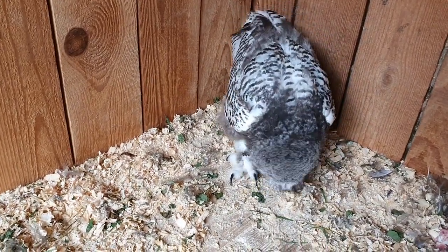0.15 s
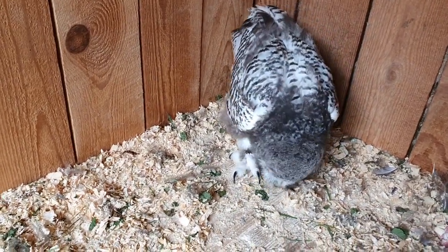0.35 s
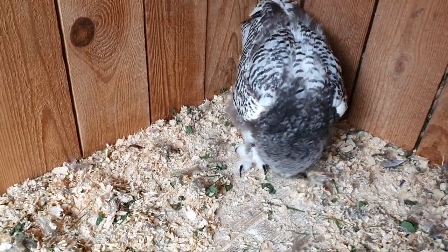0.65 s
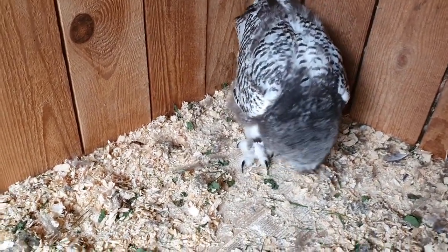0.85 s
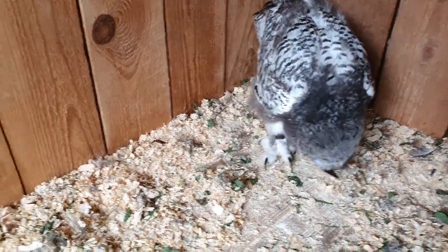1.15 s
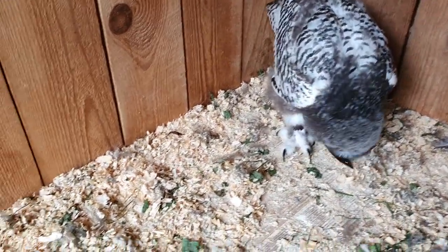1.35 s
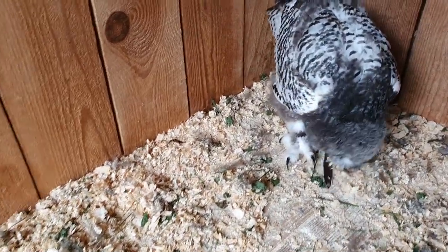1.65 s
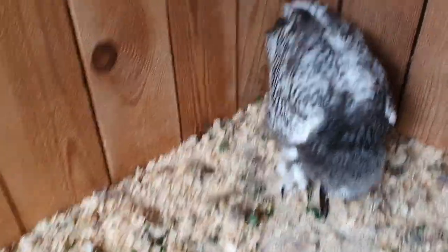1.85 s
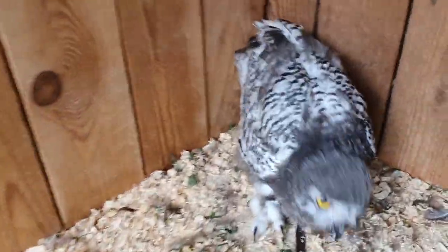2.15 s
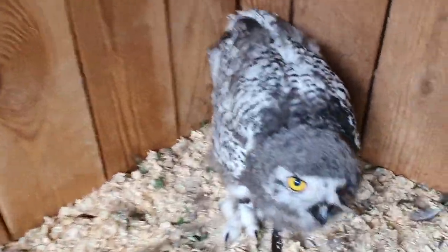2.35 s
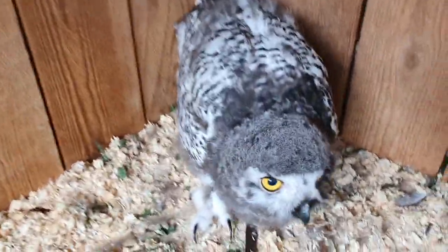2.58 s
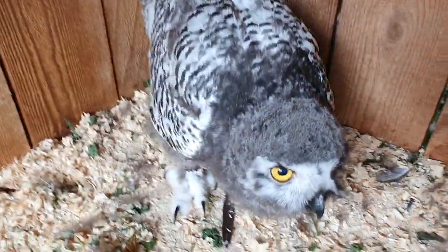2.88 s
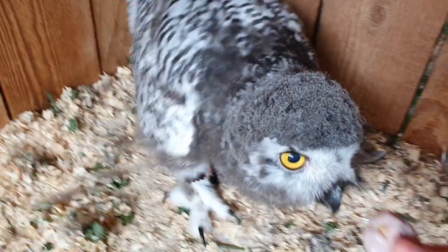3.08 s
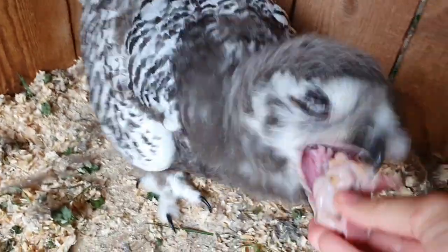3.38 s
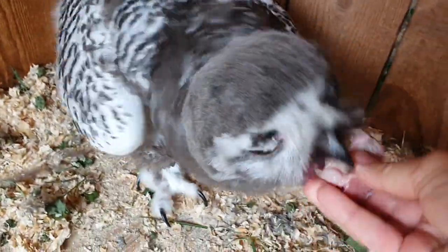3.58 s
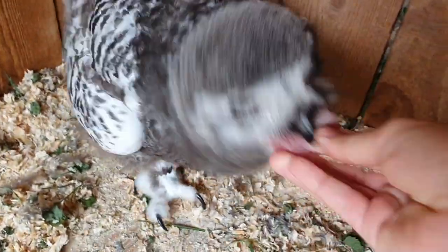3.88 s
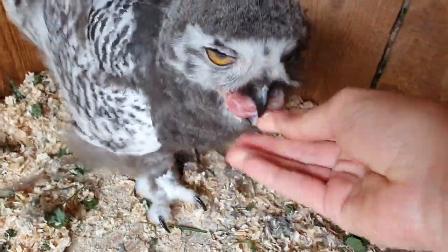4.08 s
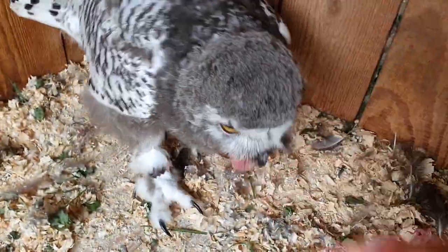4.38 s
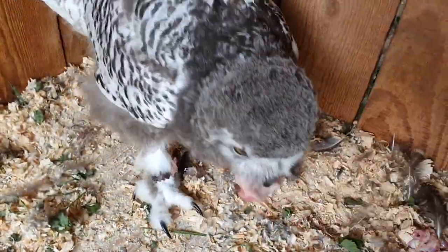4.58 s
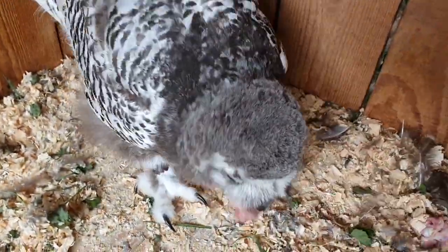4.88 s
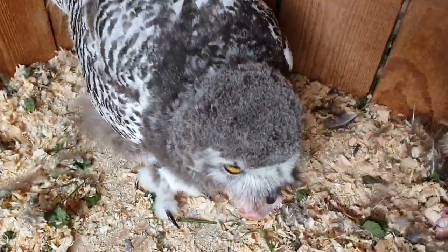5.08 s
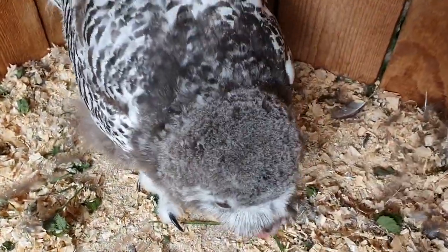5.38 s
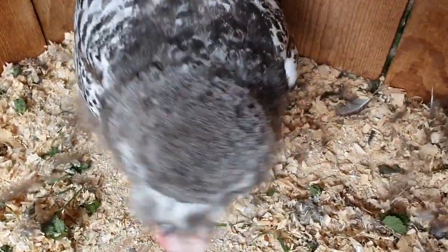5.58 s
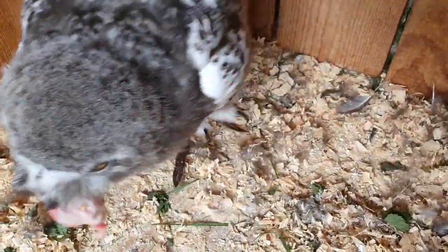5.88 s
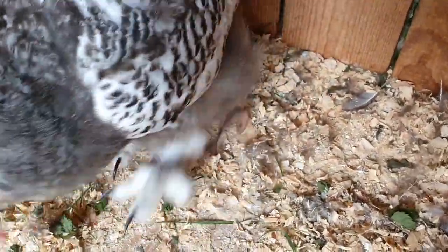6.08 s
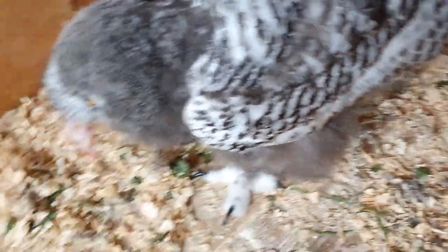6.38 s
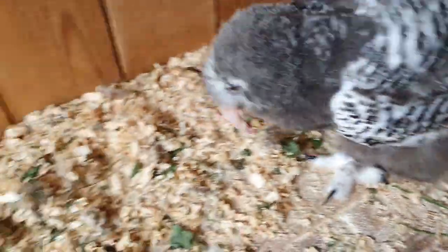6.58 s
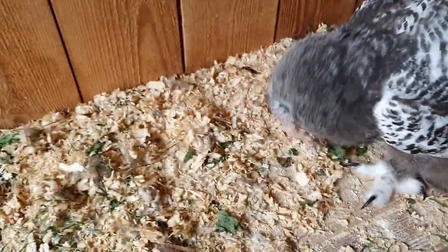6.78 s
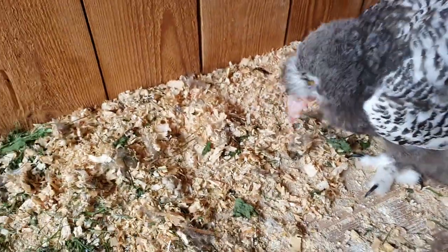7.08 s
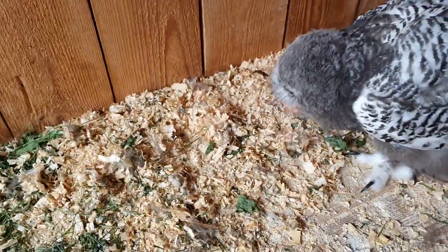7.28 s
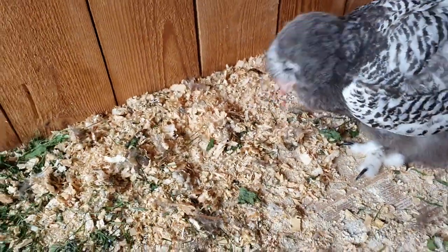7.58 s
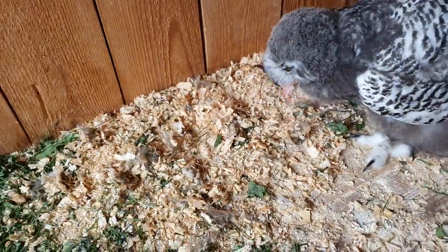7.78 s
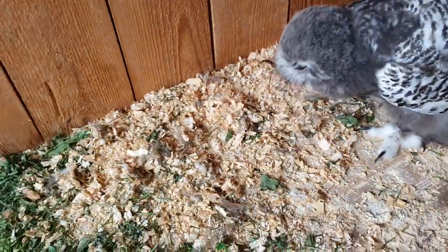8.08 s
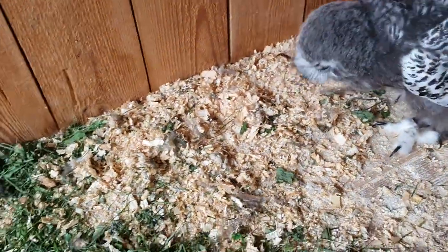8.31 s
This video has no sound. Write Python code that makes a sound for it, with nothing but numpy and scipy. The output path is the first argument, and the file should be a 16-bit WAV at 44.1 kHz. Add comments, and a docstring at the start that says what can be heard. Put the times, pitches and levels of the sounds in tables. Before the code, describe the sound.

In a small wooden pen, an owl chick gives two short hoarse squeals, each whistling up, rasping and dropping. Soft wheezy peeps follow, then a fast twitter of tiny chirps and clicks with scrapes in dry shavings. Two more squeals come, then two deep thumps as it hops over the hollow floor, and two weaker squeals. Close microphone, low rumble and quiet hush beneath.

```python
"""A snowy owl chick begs in a wooden pen: hoarse squeals whose whistle sweeps up, turns to rasp and falls.
Airy peeps and a quick twitter of rising chirps and low chips follow as it takes meat from a hand.
It hops away: decaying floor and board modes thump, with filtered-noise taps, scrapes and crackling shavings.
The plank walls answer as a short noise tail, over a low rumble and a hush of coloured noise."""
import sys
import numpy as np
from scipy import signal
from scipy.fft import rfft, irfft, next_fast_len
from scipy.io import wavfile
from scipy.ndimage import map_coordinates

SR = 44100
rng = np.random.default_rng(int(sys.argv[2]) if len(sys.argv) > 2 else 0)


def to_wav(sig):
    """Store sig (one row per channel, or 1-D mono) as 16-bit WAV at the path in sys.argv[1].

    Samples outside -1..1 are clipped; the rate is SR.
    """
    pcm = np.clip(np.atleast_2d(sig), -1, 1) * 32767
    pcm = np.round(pcm).astype(np.int16)
    wavfile.write(sys.argv[1], SR, pcm.T)  # frames by channels


N = 372644


def amp(db):
    """Decibels to gain."""
    return 10 ** (np.asarray(db) / 20)


def unit(x):
    """Scaled to rms 1."""
    return x / np.sqrt(np.mean(x ** 2) + 1e-20)


def along(points, hz):
    """(Hz, value) points read on a log axis."""
    f, v = np.transpose(points)
    return np.interp(np.log(hz + 1), np.log(f + 1), v)


def clock(length_s):
    """Sample times of a span in seconds."""
    return np.arange(int(length_s * SR)) / SR


def add(track, start_s, x):
    """Mix x into the track at start_s."""
    part = track[round(start_s * SR):][:len(x)]
    part += x[:len(part)]


def filtered(x, response):
    """x times a response of frequency."""
    n = x.shape[-1]
    m = next_fast_len(n + 8192)
    spectrum = rfft(x, m) * response(np.fft.rfftfreq(m, 1 / SR))
    return irfft(spectrum, m)[..., :n]


def resonance(f, hz, q):
    """Response of one resonance, 1 at its top."""
    return 1j * f * hz / q / (hz * hz - f * f + 1j * f * hz / q)


def noise(n, spectrum):
    """Noise of rms 1 with a (Hz, dB) colour."""
    return unit(filtered(rng.standard_normal(n), lambda f: amp(along(spectrum, f))))


def band(n, hz, q):
    """Noise of rms 1 through one resonance, applied twice for steep sides."""
    return unit(filtered(rng.standard_normal(n), lambda f: resonance(f, hz, q) ** 2))


def wobble(n, rate):
    """A smooth random curve, rate knots a second."""
    knots = rng.standard_normal(int(n * rate / SR) + 4)
    return map_coordinates(knots, [np.arange(n) * rate / SR])


def whistle(pitch_hz, jitter, rate):
    """A sine of rms 1 whose pitch shakes by the share jitter."""
    shaken_hz = pitch_hz * (1 + jitter * wobble(len(pitch_hz), rate))
    return np.sqrt(2) * np.sin(2 * np.pi * np.cumsum(shaken_hz) / SR)


def swell(t, peak):
    """A rounded rise and fall that tops at the share peak of its length."""
    ramp = np.interp(t / t[-1], [0, np.clip(peak, .05, .95), 1], [0, 1, 0])
    return np.sin(np.pi / 2 * ramp)


# Stereo field. Each row: frequency in Hz, left-right correlation.
LIKENESS = [(60, .97), (130, .9), (260, .6), (500, .15), (1000, -.1), (4000, 0)]


def spread(pair):
    """Two unrelated signals become a stereo field, alike in the bass."""
    turn = lambda f: np.arccos(np.clip(along(LIKENESS, f), -1, 1)) / 2
    mid, side = filtered(pair, lambda f: np.array([np.cos(turn(f)), np.sin(turn(f))]))
    return np.array([mid + side, mid - side])


# Decay of the plank walls' answer. Each row: frequency in Hz, t60 in s.
PEN_T60 = [(150, .22), (1000, .22), (5000, .15), (12000, .12)]


def in_pen(x, lead_ms, pan_db, wet_db):
    """Direct sound, left side ahead by lead_ms, plus the close walls' answer: a decaying noise tail."""
    hz, t, z = signal.stft(rng.standard_normal((2, SR // 3)), SR, nperseg=256)
    decay = amp(-60 * t / along(PEN_T60, hz)[:, None])
    tail = signal.istft(z * decay, SR, nperseg=256)[1]
    age = np.arange(tail.shape[1]) / SR
    early_boost = 1 + 1.3 * np.exp(-age / .012)
    tail = spread(tail * early_boost * (age > .002))
    echo = signal.fftconvolve(x[None], tail / np.linalg.norm(tail[0]), axes=1)[:, :N]
    sides = np.array([[.5], [-.5]])
    direct = filtered(x, lambda f: np.exp(2j * np.pi * f * sides * lead_ms / 10 ** 3))
    return direct * amp(sides * pan_db) + amp(wet_db) * echo


# Course of the rumble. Each row: time in s, relative level in dB.
RUMBLE_COURSE = [(0.0, -55), (1.878, -53.5), (2.49, -46), (3.217, -50.5), (8.45, -53.5)]
# Colour of the rumble. Each row: frequency in Hz, relative level in dB.
RUMBLE_COLOUR = [(15, -45), (27, -20), (40, -4), (58, 3), (97, -3), (128, -17), (200, -36), (400, -80),
                 (1000, -140)]
# Colour of the surrounding hush. Each row: frequency in Hz, relative level in dB.
HUSH_COLOUR = [(76, -40), (130, -3), (170, -6), (300, -8), (450, -11.5), (640, -11.5), (780, -8.5),
               (1030, -9.5), (1400, -16.5), (1900, -26), (2600, -31.5), (5000, -35.5), (6800, -32),
               (8500, -39), (15800, -43.5)]
HUSH_DB = -61.3  # mean, before the stereo spread


def background():
    """Deep noise whose level drifts, and a nearly steady hush of coloured noise."""
    level_db = np.interp(np.arange(N) / SR, *np.transpose(RUMBLE_COURSE))
    rumble = amp(level_db + 4.5) * spread(np.array([noise(N, RUMBLE_COLOUR), noise(N, RUMBLE_COLOUR)]))
    hush_gain = amp(HUSH_DB + .6 * wobble(N, 3))
    hush = hush_gain * spread(np.array([noise(N, HUSH_COLOUR), noise(N, HUSH_COLOUR)]))
    return (rumble + hush) * amp([[.3], [-.3]])


# Dry wood shavings. Each row: frequency in Hz, relative level in dB.
SHAVINGS_COLOUR = [(800, -30), (2500, 7), (6500, 3), (8500, -3), (11000, -3), (15500, -2)]
FLAKES_PER_S, FLAKE_SPREAD_DB = 800, 5  # mean snap rate; standard deviation of snap level


def crackle(n):
    """Dry shavings snapping one by one: sparse random impulses, coloured, rms 1."""
    hits = rng.random(n) < FLAKES_PER_S / SR
    sizes = rng.standard_normal(n) * amp(FLAKE_SPREAD_DB * rng.standard_normal(n))
    return unit(filtered(hits * sizes, lambda f: amp(along(SHAVINGS_COLOUR, f))))


# Feet and feathers in the bedding. Each row: start in s, length in s, scrape level in dB, crackle level in dB.
SCUFF_EVENTS = [(.057, .015, -62, -66), (.275, .012, -66, -68), (0.415, .1, -93, -72),
                (0.531, 0.089, -72, -73), (3.059, 0.07, -52, -59), (3.263, 0.22, -65, -58.5),
                (3.455, 0.043, -48, -59), (3.5, .38, -70, -68), (3.935, .06, -43.5, -63),
                (4.049, 0.11, -61, -69), (6.012, 0.036, -76, -61), (6.104, 0.032, -74, -61),
                (6.145, .02, -48.5, -53)]
# Scrape on the boards. Each row: frequency in Hz, relative level in dB.
SCRAPE_COLOUR = [(100, -33.5), (200, 2.5), (500, 2.5), (800, 2), (1300, -18), (1900, -18), (3000, -8.5),
                 (6000, -16), (15000, -65.5)]
CRACKLE_T60_S = .18  # shavings kicked up by a landing


def scuffs():
    """A dull scrape of uneven noise under crackling shavings; every landing kicks up more of them."""
    out = np.zeros(N)
    for start_s, length_s, scrape_db, crackle_db in SCUFF_EVENTS:
        t = clock(length_s)
        scrape = unit(noise(len(t), SCRAPE_COLOUR) * amp(5.5 * wobble(len(t), 206)))
        scuff = amp(scrape_db) * scrape + amp(crackle_db) * crackle(len(t))
        add(out, start_s, scuff * swell(t, peak=.24))
    t = clock(CRACKLE_T60_S)
    for start_s, *_, crackle_db in STEP_EVENTS:
        add(out, start_s, amp(crackle_db - 60 * t / CRACKLE_T60_S) * crackle(len(t)))
    return out


# Light taps on the wood. Each row: start in s, relative level in dB, centre in Hz.
TAP_EVENTS = [(.058, -44.5, 1530), (.276, -48.5, 1030), (.868, -47, 1400), (2.786, -51, 1870),
              (2.985, -53, 420), (3.062, -44, 600), (3.431, -40, 1050), (3.468, -45, 1500),
              (3.475, -42, 1850), (3.627, -49, 1200), (3.938, -45, 800), (3.953, -40.5, 600),
              (3.969, -38.5, 380), (5.927, -50, 520), (7.182, -57, 4270), (7.345, -59, 4900),
              (8.353, -54, 1390), (8.386, -46, 600)]
BEAK_HZ, CLAW_HZ = 2170, 1520  # click centres
TAP_CYCLES = 71  # a click falls 60 dB in this many cycles
TAP_WOOD_DB = -14  # the boards' answer, relative to the click


def taps():
    """Dry contacts of beak and claws: decaying noise bands, each with a little knock from the wood."""
    out, t = np.zeros(N), clock(.2)
    beak = [(start_s, click_db, BEAK_HZ) for start_s, _, click_db in CHIP_EVENTS]
    claws = [(start_s, click_db, CLAW_HZ) for start_s, _, _, click_db, _ in STEP_EVENTS]
    for start_s, db, hz in TAP_EVENTS + beak + claws:
        click = amp(-60 * t * hz / TAP_CYCLES) * band(len(t), hz, q=1.6)
        wood = amp(TAP_WOOD_DB - 60 * t / .14) * band(len(t), 420, q=.5)
        add(out, start_s, amp(db) * (click + wood) * (1 - np.exp(-t / .0005)))
    return out


CREST_HZ, RISE_S = 8500, .041  # pitch the climb tends to; its time constant
FALL_HZ_PER_S, END_HZ = 100000, 3100
RISE_WIDTH_S = .009  # standard deviation of the rising whistle's bell
HISS_ATTACK_S, HISS_RELEASE_S = .032, .012
HOARSE_CLEAR, HOARSE_STRAINED = .08, .96  # power share of rasp in the whistles and between them


def gesture(t, start_hz, rise_peak_s, fall_peak_hz, fall_width_s, rise_db, hiss_db, fade_db, fall_db):
    """Pitch, gain and hoarseness of a squeal: a slowing climb, strain, a drop; both sweeps ring out clear."""
    left_s = t[-1] - t
    climb_hz = CREST_HZ - (CREST_HZ - start_hz) * np.exp(-t / RISE_S)
    pitch_hz = np.minimum(climb_hz, END_HZ + FALL_HZ_PER_S * left_s)
    fall_peak_s = (fall_peak_hz - END_HZ) / FALL_HZ_PER_S
    rise = np.exp(-((t - rise_peak_s) / RISE_WIDTH_S) ** 2 / 2)
    fall = np.exp(-((left_s - fall_peak_s) / fall_width_s) ** 2 / 2)
    strain = np.clip(np.minimum(t / HISS_ATTACK_S, left_s / HISS_RELEASE_S), 0, 1) ** 2
    clear = (amp(rise_db) * rise) ** 2 + (amp(fall_db) * fall) ** 2
    strained = (amp(hiss_db - fade_db * (t / t[-1] - 1.0)) * strain) ** 2
    power = clear + strained + 1e-20
    hoarse = (HOARSE_CLEAR * clear + HOARSE_STRAINED * strained) / power
    return pitch_hz, np.sqrt(power), hoarse


# Unsteady partials of the strained voice. Each row: frequency in Hz at gape 1, relative level in dB.
RAGGED_PARTIALS = [(3950, -6), (5100, -4), (5700, -2), (6500, -3)]
RAGGED_BEND, RAGGED_FLICKER_DB = .035, 4  # scales of the random pitch share and level


def ragged(t, gape):
    """Partials of the strained voice, each bending and flickering by itself; rms 1."""
    n = len(t)
    total = np.zeros(n)
    for hz, db in RAGGED_PARTIALS:
        level = amp(db + RAGGED_FLICKER_DB * wobble(n, 110))
        bent_hz = gape * hz * (1 + RAGGED_BEND * wobble(n, 45))
        total += level * whistle(bent_hz, jitter=.018, rate=800)
    return unit(total)


OPENING_REF_HZ, OPENING_LIFT = 2500, .16  # reference for the start pitch; share it climbs
OPENING_S, OPENING_LEAD_S = .045, .005  # length; head start on the squeal


def opening(start_hz):
    """A low shaky note sliding up a little as the voice catches; higher when the squeal starts higher."""
    t = clock(OPENING_S)
    base_hz = OPENING_REF_HZ * np.sqrt(start_hz / OPENING_REF_HZ)
    pitch_hz = base_hz * (1 + OPENING_LIFT * t / OPENING_S)
    return whistle(pitch_hz, jitter=.035, rate=700) * amp(2.5 * wobble(len(t), 200)) * swell(t, peak=.3)


# Begging squeals. Each row: start in s, length in s, start pitch in Hz, time of the loudest rise in s,
# pitch of the loudest fall in Hz, width of the fall in s, rising whistle in dB, hoarse middle at its end in dB,
# its fade in dB, falling whistle in dB, thin high whistle in dB, gape as a factor on the throat's pitches,
# opening note in dB. Levels are relative.
SQUEAL_EVENTS = [(.839, .153, 4000, .021, 5100, .008, -43.5, -44.5, 1, -32.5, -76, .9, -57),
                 (1.497, .141, 5250, .017, 5250, .006, -29.5, -37.5, 2.5, -23, -76, .9, -48),
                 (4.511, .157, 4800, .029, 5250, .011, -44.5, -48.5, 0, -35, -72, 1.02, -75),
                 (4.854, .152, 4100, .023, 4900, .007, -34, -47.5, 6, -35, -69, .96, -50),
                 (7.375, .149, 5300, .02, 4600, .008, -45.5, -57, 1, -45.5, -65, 1.06, -72),
                 (7.815, .144, 4900, .012, 4400, .008, -37.5, -57.5, 18, -44, -63, .99, -52)]
# Air through the throat. Each row: frequency in Hz at gape 1, relative level in dB.
THROAT_AIR = [(1200, -22), (2200, -20), (2950, -11), (3750, -1), (4200, -2), (4750, -5), (5500, 0),
              (6300, -1), (7000, -4), (7800, -12), (8600, -28), (15000, -52)]
# Arch of the thin high whistle. Each row: share of the call, pitch in Hz.
HIGH_ARCH = [(0, 5640), (.2, 7700), (.33, 8550), (.6, 8250), (.78, 9000), (.89, 7640), (1, 5130)]
# Hiss through the wide-open beak. Each row: frequency in Hz, relative level in dB.
BEAK_HISS = [(1500, -40.5), (3500, 3), (5500, 6.5), (7200, 2), (8500, -16.5), (11000, -4), (15500, -17.5)]
UNDERTONE, UNDERTONE_DB = .72, -13  # share of the main pitch; initial level relative to the main tone


def squeals():
    """A whistle sweeps up, breaks into a ragged rasp at full strain and clears again as it falls."""
    out = np.zeros(N)
    for start_s, length_s, *sweep, high_db, gape, opening_db in SQUEAL_EVENTS:
        t = clock(length_s)
        n, share = len(t), t / t[-1]
        pitch_hz, gain, hoarse = gesture(t, *sweep)
        flutter = unit(amp(2.3 * wobble(n, 400)))
        # the throat passes little above 7 kHz
        tone = whistle(pitch_hz, jitter=.014 + .03 * hoarse, rate=900) / np.sqrt(1 + (pitch_hz / 7100) ** 30)
        tone += amp(UNDERTONE_DB) * whistle(UNDERTONE * pitch_hz, jitter=.02, rate=700) * (1 - share)
        # the throat rings low as the beak starts to close
        throat = amp(-15.5) * band(n, 1660, q=3) * swell(t, peak=.85) ** 6
        air = noise(n, [(hz * gape, db) for hz, db in THROAT_AIR])
        rasp = amp(-4.2) * air + amp(-2.1) * ragged(t, gape) + throat
        voice = np.sqrt(1 - hoarse) * tone + np.sqrt(hoarse) * rasp
        # a thin high whistle arches over the squeal
        high = whistle(np.interp(share, *np.transpose(HIGH_ARCH)), jitter=.006, rate=500)
        # a faint partial at 1.25 times the main pitch, and a faint octave
        high += amp(-6) * whistle(1.25 * pitch_hz, jitter=.012, rate=1500) * swell(t, peak=.45) ** 4
        high += amp(-6) * whistle(2 * pitch_hz, jitter=.04, rate=1300) * (1 - share) ** 2
        high += amp(3.5) * noise(n, BEAK_HISS)
        thin = amp(high_db) * high * np.sqrt(swell(t, peak=.23))
        edges = np.clip(np.minimum(t, t[-1] - t) / .003, 0, 1)
        add(out, start_s, (gain * voice + thin) * flutter * edges)
        add(out, start_s - OPENING_LEAD_S, amp(opening_db) * opening(sweep[0]))
    return out


# Ring between the planks. Each row: frequency in Hz, level in dB, Q.
CORNER_MODES = [(4900, -2, 300), (5130, -3, 420), (5310, -4, 400)]


def corner_ring(calls):
    """In the first 2 s the chick sits back in the corner: its calls excite a thin ring of the planks."""
    cornered = calls * (np.arange(N) < 2 * SR)
    return filtered(cornered, lambda f: sum(amp(db) * resonance(f, hz, q) for hz, db, q in CORNER_MODES))


SWELL_START_S, SWELL_LENGTH_S, SWELL_HZ, SWELL_DB = 1.8, 1.25, 46, -45.5


def deep_swell():
    """A deep narrow noise band swells once and dies away."""
    out, t = np.zeros(N), clock(SWELL_LENGTH_S)
    add(out, SWELL_START_S, amp(SWELL_DB) * band(len(t), SWELL_HZ, q=1.6) * swell(t, peak=.58))
    return out


# Soft wheezy peeps. Each row: start in s, length in s, centre pitch in Hz, relative level in dB before the fade.
PEEP_EVENTS = [(2.58, .26, 2950, -54.5), (3.07, .24, 2664, -57.5), (5.981, .05, 2820, -62)]
PEEP_ARCH = .06  # share the pitch lifts from the ends to the top
PEEP_FADE_DB_PER_S, PEEP_Q = 65, 8


def peeps():
    """Narrow airy notes that fade away, with a faint whistle inside and a weak lower resonance."""
    out = np.zeros(N)
    for start_s, length_s, hz, db in PEEP_EVENTS:
        t = clock(length_s)
        pitch_hz = hz * (1 + PEEP_ARCH * (swell(t, peak=.416) - .5))
        note = band(len(t), hz, q=PEEP_Q)
        note += amp(-7) * whistle(pitch_hz, jitter=.055, rate=2100)
        note += amp(-8) * band(len(t), 1620, q=8)
        add(out, start_s, amp(db - PEEP_FADE_DB_PER_S * t) * note * swell(t, peak=.2))
    return out


# Hops and steps on the hollow floor. Each row: start in s, then relative levels in dB of
# boom, knock, claw click and crackle.
STEP_EVENTS = [(3.093, -22.5, -47, -43, -61), (4.101, -35, -51, -48, -67), (5.837, -17, -23, -42, -59),
               (6.159, -12.5, -28, -39, -53)]
# The floor's lowest modes. Each row: frequency in Hz, relative level in dB, t60 in s.
FLOOR_MODES = [(96.8, 1, .24), (79, -3, .14)]


def booms():
    """The bird's weight sets the floor's lowest modes swinging: decaying sines."""
    out, t = np.zeros(N), clock(.69)
    ring = sum(amp(db - 60 * t / t60_s) * np.sin(2 * np.pi * hz * t) for hz, db, t60_s in FLOOR_MODES)
    for start_s, boom_db, *_ in STEP_EVENTS:
        add(out, start_s, amp(boom_db - 2.5) * ring * (1 - np.exp(-t / .005)))
    return out


# Board modes. Each row: frequency in Hz, mean relative level in dB, t60 in s.
BOARD_MODES = [(153, -1.5, 0.18), (238, -4, 0.1), (395, -8, 0.09), (468, -11, 0.2), (560, -7, 0.09),
               (806, -7, 0.07), (1037, -9.5, 0.055), (1330, -22, 0.05), (1950, -25, 0.08)]
CRUNCH_DB, CRUNCH_T60_S = -6.5, .08  # bedding crushed under a landing, relative to the knock


def steps():
    """Landings ring the boards as shaky decaying modes, over a short crunch of bedding."""
    out, t = np.zeros(N), clock(.5)
    for start_s, _, knock_db, *_ in STEP_EVENTS:
        knock = amp(CRUNCH_DB - 60 * t / CRUNCH_T60_S) * noise(len(t), SCRAPE_COLOUR)
        for hz, db, t60_s in BOARD_MODES:
            level = amp(db + rng.normal(0, 1.29) - 60 * t / t60_s)
            knock += level * whistle(np.full(len(t), hz), jitter=.1, rate=260)
        add(out, start_s, amp(knock_db - 4.5) * knock * (1 - np.exp(-t / .0026)))
    return out


def glide(length_s, start_hz, end_hz, jitter):
    """One tiny note of the twitter: a quickening sweep with a faint octave."""
    t = clock(length_s)
    pitch_hz = start_hz + (end_hz - start_hz) * (t / length_s) ** 1.44
    octave = amp(-30.0) * whistle(2 * pitch_hz, jitter, rate=3400)
    return (whistle(pitch_hz, jitter, rate=1920) + octave) * swell(t, peak=.31)


# Rising chirps of the twitter. Each row: start in s, length in s, start pitch in Hz, level in dB,
# low hook in dB relative to the chirp, left over right in dB.
CHIRP_EVENTS = [(3.3, 0.0082, 4200, -28, -14, -8.5), (3.379, 0.0088, 4130, -27.5, -7, -6.5),
                (3.4556, 0.0063, 4200, -32.5, -17, 5), (3.5354, 0.005, 4340, -36, -24, 4),
                (3.624, .005, 4116, -36.5, -12, -1), (3.709, 0.006, 4640, -36.5, -36, -4),
                (3.797, 0.0035, 4350, -45, -21, -1.5)]
CHIRP_END_HZ = 7000
HOOK_S, HOOK_HZ, HOOK_SAG_HZ_PER_S = .01, 3900, 3000  # length, first pitch, sag as the twitter tires


def chirps():
    """Steep chirps, a low hook beneath, hiss ahead; they shift sideways as the head tugs at the meat."""
    out, lead_t, t = np.zeros((2, N)), clock(.027), clock(HOOK_S)
    for start_s, length_s, start_hz, db, hook_db, pan_db in CHIRP_EVENTS:
        note = np.zeros(N)
        add(note, start_s, amp(db) * glide(length_s, start_hz, CHIRP_END_HZ, jitter=.055))
        hook_hz = HOOK_HZ - HOOK_SAG_HZ_PER_S * (start_s - CHIRP_EVENTS[0][0])
        hook = whistle(np.full(len(t), hook_hz), jitter=.03, rate=700) * swell(t, peak=.3)
        add(note, start_s + length_s / 3, amp(db + hook_db) * hook)
        hiss = noise(len(lead_t), BEAK_HISS) * swell(lead_t, peak=.7)
        add(note, start_s - .02, amp(db - 22) * hiss)
        out += in_pen(note, lead_ms=0, pan_db=pan_db, wet_db=-5.5)
    return out


# Low chips between the chirps. Each row: start in s, relative level in dB, beak click level in dB.
CHIP_EVENTS = [(3.349, -36.5, -48.5), (3.428, -34, -48), (3.513, -39, -42), (3.595, -41, -46.5),
               (3.678, -44.5, -44.5), (3.768, -47, -37)]
CHIP_S, CHIP_HZ, CHIP_SAG_HZ_PER_S = .007, 3650, 2700  # length, first pitch, sag as the twitter tires
CHIP_DROP, CHIP_RASP_DB = .22, -5  # share each chip falls; rasp relative to the chip


def chips():
    """Low rough falling chips between the chirps, sinking as the twitter tires."""
    out, t = np.zeros(N), clock(CHIP_S)
    for start_s, db, _ in CHIP_EVENTS:
        hz = CHIP_HZ - CHIP_SAG_HZ_PER_S * (start_s - CHIP_EVENTS[0][0])
        rasp = amp(CHIP_RASP_DB) * band(len(t), hz, q=2) * swell(t, peak=.3)
        add(out, start_s, amp(db) * (glide(CHIP_S, hz, hz * (1 - CHIP_DROP), jitter=.09) + rasp))
    return out


# Croaks that end some squeals. Each row: start in s, caught note level in dB, croak level in dB.
CROAK_EVENTS = [(4.991, -40, -50), (7.509, -47, -61), (7.946, -42, -49)]
# Colour of a croak. Each row: frequency in Hz, relative level in dB.
CROAK_COLOUR = [(500, -20), (900, -6), (1250, -12), (1650, 1), (2300, -7), (3000, -1), (3800, 0),
                (5000, -9), (9000, -37.5)]
CROAK_S, CATCH_HZ = .024, 3700  # length of note and croak; pitch of the caught note


def croaks():
    """At the bottom of the fall the voice catches on one shaky note, then breaks into a low croak."""
    out, t = np.zeros(N), clock(CROAK_S)
    for start_s, note_db, croak_db in CROAK_EVENTS:
        caught = whistle(np.full(len(t), CATCH_HZ), jitter=.035, rate=700) * swell(t, peak=.2) ** 3
        add(out, start_s, amp(note_db) * caught)
        rough = unit(noise(len(t), CROAK_COLOUR) * amp(4 * wobble(len(t), 400)))
        add(out, start_s + CROAK_S / 3, amp(croak_db) * rough * swell(t, peak=.35))
    return out


def scene():
    """The voice, the feet and the background together."""
    calls = squeals()
    voice = calls + corner_ring(calls) + croaks() + peeps()
    begging = in_pen(voice, lead_ms=.12, pan_db=1.2, wet_db=-6.7)
    feeding = chirps() + in_pen(chips(), lead_ms=0, pan_db=-4.5, wet_db=-6.0)
    moving = in_pen(taps() + scuffs(), lead_ms=.1, pan_db=2.0, wet_db=-2)
    landing = in_pen(steps(), lead_ms=.12, pan_db=1.5, wet_db=-2.5)
    landing += booms() * amp([[.7], [-.7]])
    return begging + feeding + moving + landing + deep_swell() + background()


TOP_HZ = 15850


def record(dry):
    """A sharp band limit: nothing from TOP_HZ up passes."""
    return filtered(dry, lambda f: f < TOP_HZ)


dry = scene()
out = record(dry)
to_wav(out)
```